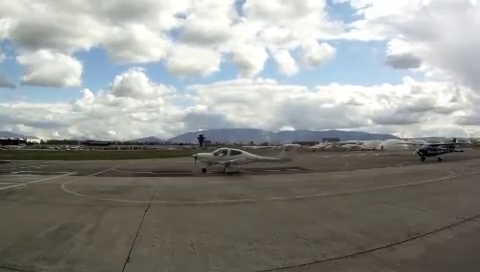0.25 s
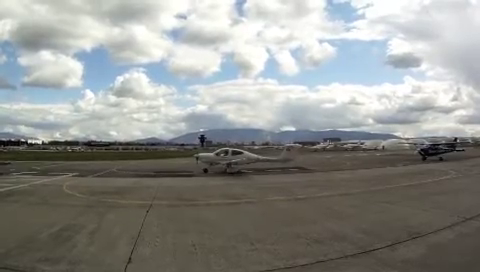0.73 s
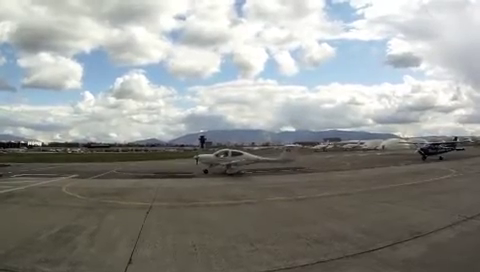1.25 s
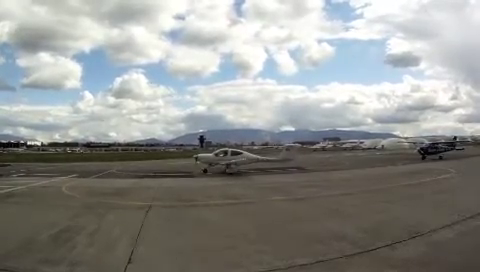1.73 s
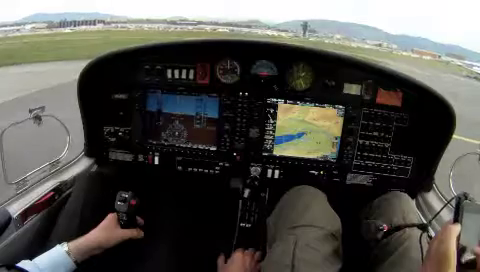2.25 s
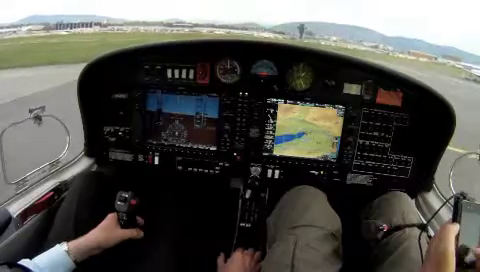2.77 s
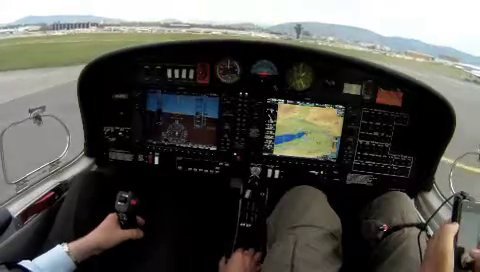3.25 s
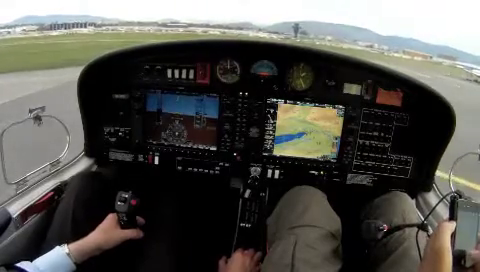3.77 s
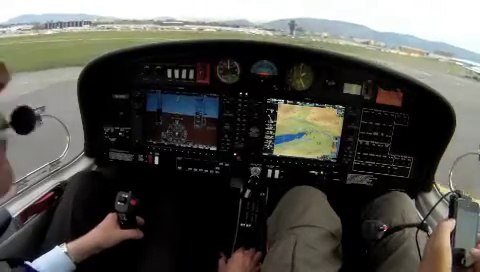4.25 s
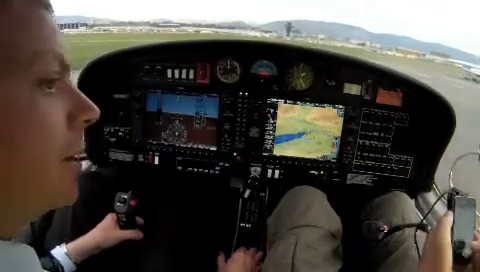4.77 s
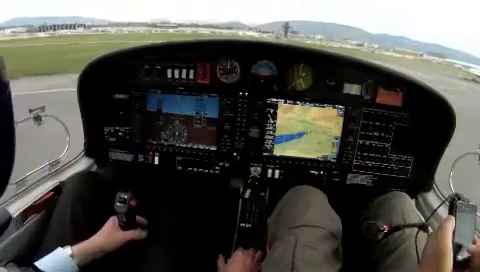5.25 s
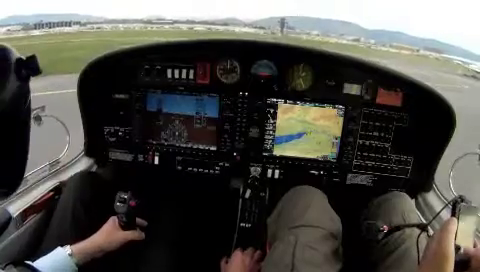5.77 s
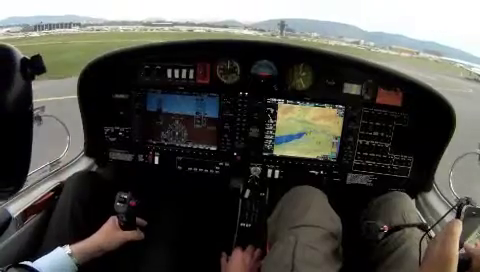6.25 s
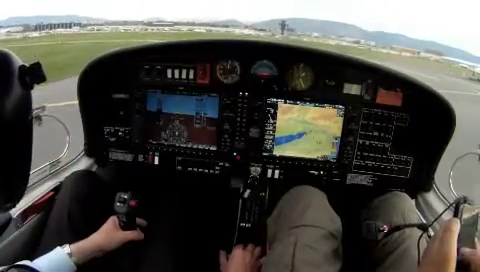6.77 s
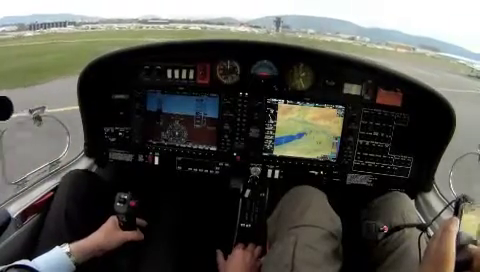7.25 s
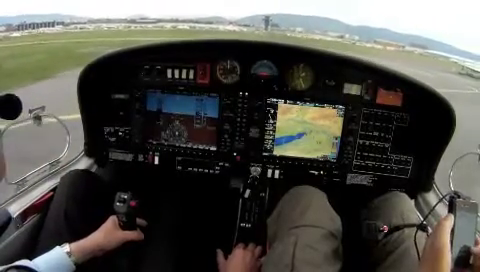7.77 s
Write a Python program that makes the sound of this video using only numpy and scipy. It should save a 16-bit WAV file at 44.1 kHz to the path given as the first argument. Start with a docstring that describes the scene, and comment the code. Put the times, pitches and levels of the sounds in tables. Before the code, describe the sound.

On an open apron a small propeller plane idles, its blades thudding, slapping and hissing in a rapid flutter over low exhaust puffs. At about two seconds it cuts abruptly to inside the cabin: a deep boom throbbing seven or eight times a second, with muffled engine clatter, faint gear whine and a few ticks. After six seconds the throttle opens slightly, pitch rises and a loose fitting rattles.

```python
"""An airport apron, then a cabin: a light aircraft with a geared four-cylinder piston engine idles.
Outside, three blades thud, slap and hiss over the exhaust puffs, each blade a pulse and a noise burst.
Inside, firing and blade tones beat into a throbbing boom; repeating noise bursts clatter, mesh tones whine.
The throttle opens a little and a loose fitting rattles. Coarse sampling adds a thin mirrored fizz."""
import sys
import numpy as np
from scipy.fft import rfft, irfft, next_fast_len
from scipy.io import wavfile
from scipy.ndimage import map_coordinates

SR = 44100
rng = np.random.default_rng(int(sys.argv[2]) if len(sys.argv) > 2 else 0)


def master(y):
    """Save y as 16-bit WAV."""
    cut = np.clip(np.atleast_2d(y).T, -1, 1)
    pcm = np.round(cut * 32767)  # scale
    wavfile.write(sys.argv[1], SR, pcm.astype(np.int16))


N = 353665
T = np.arange(N) / SR
GEAR_RATIO, BLADES = 1.69, 3  # crank turns per propeller turn
MESH_TEETH = 29
INSIDE_S, IDLE_HZ = 2.04, 31.68  # cabin takes over; crank idle speed there


# propeller hunting outside: (time [s], blade passing rate [Hz])
BLADE_RATE = [(0.0, 45.3), (0.23, 44.8), (0.532, 45.3), (1.464, 44.7), (1.864, 45.0), (1.97, 44.7)]
# throttle opening in two pushes: (time [s], crank speed above idle [Hz])
SPEED_UP = [(6.15, 0), (6.4, .93), (6.65, 1.37), (7, 2.66), (7.2, 3.04), (7.5, 3.3), (8, 3.4)]


def crank_speed():
    """Crank turns per second: slow idle outside; in the cabin a faster idle, then more throttle."""
    blade_rate_hz, = curves(BLADE_RATE)
    above_idle_hz, = curves(SPEED_UP)
    outside_hz = blade_rate_hz * GEAR_RATIO / BLADES
    cabin_hz = IDLE_HZ + above_idle_hz + 0.0201 * wobble(3)
    return np.where(T < INSIDE_S, outside_hz, cabin_hz)


def throttled(speed, idle, fast):
    """Passes from the idle to the fast value as crank speed rises 1.4 to 2.4 Hz above idle."""
    return idle + (fast - idle) * np.clip((speed - IDLE_HZ - 1.4) / 1.0, 0, 1)


# exhaust tones: (order [multiple of crank speed], level [dB])
EXHAUST = [(1, -46.5), (2, -30), (2.5, -59), (3, -43.5), (3.5, -63.5), (4, -30.5), (5, -50.5), (6, -29),
           (7, -38), (8, -33.5), (12, -47.5), (16, -51)]


def exhaust(crank):
    """Firing overtones cross zero together, a push then a sharp suck; other orders join with random phases, so
    the puffs stay even."""
    puffs = crank + 1 / 4
    total = 0
    for order, db in EXHAUST:
        phase = rng.random() if order % 2 else 1 / 4
        total = total + amp(db) * tone(order * puffs + phase, waver=0.019)
    return total


# thud level: (time [s], level before trim [dB])
THUD_LEVEL = [(0, -29), (.2, -26), (.8, -32.5), (1.35, -32), (1.9, -28)]
# thud spectrum: (frequency [Hz], relative level [dB])
THUD = [(45, -3), (90, -5), (135, -3.5), (180, 0), (225, 1.5), (270, -2.5), (315, -1.5), (360, -2),
        (405, -7), (450, -11.5), (520, -28)]


def blade_thud(blade):
    """Low pressure pulse from each passing blade."""
    level_db, = curves(THUD_LEVEL)
    pulses = slaps(blade, THUD, smear_rad=2.44, jitter_s=0.0001, scatter_db=-0.5, count=12)
    return amp(level_db - 0.8) * pulses


# blade wash: (time [s], swish level before trim [dB], hiss level before trim [dB])
WASH_LEVEL = [(0.0, -28.5, -33.5), (0.232, -29, -34), (0.554, -28, -32.5), (0.688, -28, -33),
              (1.18, -28, -31.5), (1.316, -30.5, -34.5), (1.9, -30, -33.5)]
# slap spectrum: (frequency [Hz], relative level [dB])
SLAP = [(400, -33), (450, -2.5), (495, -3), (540, 2.5), (585, 5), (680, 3), (720, -12.5), (770, -1.5),
        (855, 2), (920, -8), (1080, -11), (1220, -2), (1400, -20)]


def blade_slap(blade):
    """Sharper pulse per blade, growing faster than the swish when blades bite into rough air."""
    swish_db, _ = curves(WASH_LEVEL)
    pulses = slaps(blade - .1, SLAP, smear_rad=0.88, jitter_s=.00009, scatter_db=1.3, count=32)
    return amp(2.8 * (swish_db + 28) - 30.0) * pulses


# swish and hiss spectra: (frequency [Hz], relative level [dB])
SWISH = [(150, -39), (260, -2), (450, -5), (620, -3.5), (850, -4.5), (1000, -3.5), (1220, -3), (1500, -8),
         (2200, -30)]
HISS = [(820, -33.5), (1400, -6.5), (1680, 1), (1960, -4.5), (2280, -0.5), (2620, -7.5), (2890, -6),
        (3440, -8.5), (3770, -12.5), (4760, -11), (5600, -17), (7280, -44.5), (12300, -120)]


def blade_wash(blade):
    """Noise burst of swish and hiss from each passing blade; part of the hiss repeats per blade."""
    swish_db, hiss_db = curves(WASH_LEVEL)
    passing = bursts(blade, decay=0.62, floor=.78, scatter_db=3)
    swish = amp(swish_db - 2.0) * coloured(passing * rng.standard_normal(N), SWISH)
    hiss_noise = (passing + 1.0) * churn(blade, repeat=0.19, size=980)
    return swish + amp(hiss_db - 0.05) * coloured(hiss_noise, HISS)


# snaps in the wash: (time [s], relative peak [dB])
SNAPS = [(0.6895, -13), (1.1119, -9), (1.1564, -15), (1.408, -17.5)]
# snap spectrum: (frequency [Hz], relative level [dB])
SNAP = [(600, -1), (1500, 3.5), (3200, -0.5), (5500, -6.5)]


def wash_snaps():
    """Sharp noisy snaps in the blade wash."""
    return amp(-12.0) * taps(SNAPS, SNAP, rise_s=0.0029, t60_s=0.014)


# low wash spectrum: (frequency [Hz], relative level [dB])
LOW_WASH = [(10, -26.5), (22, -4), (45, 7), (90, -3), (150, 3.5), (230, 0), (400, -11.5), (600, -33)]


def low_wash():
    """Steady low-frequency noise of the wash."""
    return amp(-30.5) * coloured(rng.standard_normal(N), LOW_WASH)


def outside(crank, blade):
    """Exhaust and propeller summed as heard on the apron."""
    propeller = blade_thud(blade) + blade_slap(blade) + blade_wash(blade)
    return exhaust(crank) + propeller + wash_snaps() + low_wash()


# cabin resonance under the firing tone: (frequency [Hz], level before trim [dB])
FIRING_PATH = [(63.4, -21.5), (65, -15.5), (68, -13.4), (70, -13)]


def cabin_firing(speed, crank):
    """Two firings a turn; more throttle lifts the tone into a cabin resonance."""
    firing_db = along(FIRING_PATH, 2 * speed) - 1.05
    return amp(firing_db) * tone(2 * crank, waver=throttled(speed, idle=0.088, fast=.03))


# blade tones in the cabin: (multiple of blade rate, idle level [dB], fast level [dB])
BLADE_TONES = [(1, -31, -34.5), (2, -42, -50)]


def cabin_chop(speed, blade):
    """The lowest lies 7 to 8 Hz below the firing tone and beats with it; the second is its octave."""
    return sum(amp(throttled(speed, idle, fast)) * tone(k * blade, waver=0.041)
               for k, idle, fast in BLADE_TONES)


# other engine tones: (order [multiple of crank speed], idle level [dB], fast level [dB])
DRONE = [(.5, -48.5, -55.5), (2.493, -37, -40.5), (2.987, -35, -46.5), (3.55, -40.5, -54), (3.91, -42, -56),
         (5.987, -48.5, -51.5), (7.95, -55, -57), (10.01, -55, -60.5), (12.04, -57, -68),
         (18.09, -54.5, -49.5), (20, -50.5, -60), (21.3, -54.5, -79), (21.9, -62.5, -63),
         (24.03, -57, -51.5), (25.96, -49.5, -65), (29.48, -57.5, -74.5), (30.65, -62, -74.5),
         (41.8, -64.5, -75.5), (49.9, -67.5, -66), (109, -74, -105)]


def cabin_drone(speed, crank):
    """Low orders keep step with firing; higher ones arrive by many airframe paths, phases random."""
    total = 0
    for order, idle, fast in DRONE:
        phase = (order > 4) * rng.random()
        total = total + amp(throttled(speed, idle, fast)) * tone(order * crank + phase, waver=0.21)
    return total


# boom surges and sags: (time [s], level change [dB])
SURGES = [(3.9, 4), (4.55, -8.5), (5.6, 6.5), (5.87, -7)]
# boom spectrum: (frequency [Hz], relative level [dB])
BOOM = [(10, -27), (20, -22), (35, -22.5), (50, -9), (70, -2), (110, 1.5), (125, -16), (145, -15.5),
        (200, -38.5)]


def cabin_rumble(speed):
    """Low noise that wavers, surges and sags."""
    surge_s, waver_db = 0.11, 2
    surge_db = sum(db * np.exp(-((T - s) / surge_s) ** 2) for s, db in SURGES)
    boom_db = throttled(speed, idle=-28.5, fast=-34) + surge_db + waver_db * wobble(3.886)
    return amp(boom_db + 1.4) * coloured(rng.standard_normal(N), BOOM)


# panel, knock and clatter spectra: (frequency [Hz], relative level [dB])
PANELS = [(120, -9.5), (150, 4.5), (195, -1), (225, -3), (260, 1.5), (290, -10.5), (400, -12.5), (480, -11),
          (600, -28)]
KNOCK = [(200, -28.5), (330, -8), (480, -10), (570, 2.5), (680, 2.5), (800, 1.5), (865, -4.5), (960, 0.5),
         (1040, -16), (1400, -41.5)]
CLATTER = [(620, -39), (1050, -12.5), (1290, -6.5), (1410, -14.5), (1550, -5), (1690, -8.5), (1840, -5),
           (1900, -4), (2000, -11), (2570, -18), (2840, -17), (3090, -19.5), (3580, -27), (3780, -30.5),
           (5600, -38), (7280, -73), (12300, -120)]


def cabin_clatter(speed, crank):
    """Combustion knock and valve clatter through the firewall, partly repeating every two turns."""
    # knock is stronger in a narrow speed range
    shudder_hz, shudder_width_hz, shudder_db = 33.1, 0.47, 4
    shudder = np.exp(-((speed - shudder_hz) / shudder_width_hz) ** 2)
    knock_db = throttled(speed, idle=-40.5, fast=-42.5) + shudder_db * shudder
    clatter_db = throttled(speed, idle=-47.5, fast=-50)
    cycle = crank / 2
    firings = bursts(2 * crank, decay=0.52, floor=0.9, scatter_db=2.0)
    # one cylinder knocks harder
    uneven = bursts(crank, decay=0.6, floor=0.6, scatter_db=1.0)
    uneven = uneven * bursts(cycle - .62, decay=0.3, floor=1.9, scatter_db=3.0)
    panels = amp(-44) * coloured(churn(cycle, repeat=0.23, size=2784), PANELS)
    knock_noise = firings * uneven * churn(cycle, repeat=0.44, size=2784)
    clatter_noise = (firings + 0.42) * churn(cycle, repeat=0.33, size=2784)
    knock = amp(knock_db - 3.0) * coloured(knock_noise, KNOCK)
    return panels + knock + amp(clatter_db - 1) * coloured(clatter_noise, CLATTER)


# cabin resonances under two mesh overtones: (frequency [Hz], level [dB])
LOW_WHINE_PATH = [(1840, -53.5), (1950, -56.5), (1975, -79.5)]
HIGH_WHINE_PATH = [(2755, -67), (2820, -61), (2880, -64), (2925, -57), (2950, -63), (2995, -67),
                   (3045, -71)]


def gears(speed, crank):
    """Tooth-mesh overtones swell and fade through cabin resonances; the lower is roughened every turn."""
    low_db = along(LOW_WHINE_PATH, 2 * MESH_TEETH * speed)
    high_db = along(HIGH_WHINE_PATH, 3 * MESH_TEETH * speed)
    roughness = bursts(crank, decay=0.25, floor=2.6, scatter_db=-3.3)
    low = amp(low_db) * unit(tone(2 * MESH_TEETH * crank, waver=0.2) * roughness)
    return low + amp(high_db) * tone(3 * MESH_TEETH * crank, waver=0.25)


# fitting ticks: (time [s], relative peak [dB])
TICKS = [(2.5336, -39), (3.166, -39.5), (4.3006, -38.5), (6.4668, -45.5), (6.602, -45), (6.6645, -35.5),
         (6.739, -46), (6.784, -38), (6.963, -44.5), (7.086, -48.5), (7.1723, -44), (7.5184, -42.5),
         (7.6452, -46), (7.8884, -48)]
# tick spectrum: (frequency [Hz], relative level [dB])
FITTING = [(1200, -30.5), (2300, 2.5), (3000, 11), (3600, -1.5), (4500, -8), (5600, -12)]


def fitting(speed, crank):
    """Loose fitting ticks, and crackles finely with the firing as the engine speeds up."""
    shake = np.clip((speed - 32) / 1.2, 0, 1)
    contacts = bursts(2 * crank, decay=0.24, floor=.15, scatter_db=3.2) * rng.standard_normal(N)
    crackle = coloured(contacts, [(1800, -17), (3000, 3), (5600, -4)])
    ticks = taps(TICKS, FITTING, rise_s=0.03, t60_s=0.05)
    return amp(-70.0) * shake * crackle + amp(-9.5) * ticks


def cabin(speed, crank, blade):
    """Boom, clatter, gear whine and fitting summed as heard inside."""
    boom = cabin_firing(speed, crank) + cabin_drone(speed, crank) + cabin_chop(speed, blade)
    boom = boom + cabin_rumble(speed)
    return boom + cabin_clatter(speed, crank) + gears(speed, crank) + fitting(speed, crank)


def tone(turns, waver):
    """Cosine locked to a shaft, rms 1 before it wavers in strength and phase."""
    angle = 2 * np.pi * turns
    in_phase = np.cos(angle) * (1 + waver * wobble(9))
    quadrature = waver * wobble(9) * np.sin(angle)
    return np.sqrt(2) * (in_phase + quadrature)


def slaps(turns, spectrum, smear_rad, jitter_s, scatter_db, count):
    """One pulse a turn, overtones scattered by the ground; time and size vary a little."""
    uneven = turns + jitter_s * wobble(39.46) * np.gradient(turns) * SR
    k = np.arange(1, count + 1)[:, None]
    phase = smear_rad * rng.standard_normal(k.shape)
    shape = np.cos(2 * np.pi * k * np.arange(1024) / 1024 + phase).sum(0)
    train = map_coordinates(shape, [uneven % 1 * len(shape)], mode="grid-wrap")
    return coloured(train * amp(scatter_db * wobble(39.68)), spectrum)


def bursts(turns, decay, floor, scatter_db):
    """Envelope jumping once a turn to a random height; decay is a share of the turn."""
    heights = amp(scatter_db * rng.standard_normal(1024))
    return floor + heights[np.floor(turns).astype(int)] * np.exp(-(turns % 1) / decay)


def churn(turns, repeat, size):
    """White excitation: the repeat share of its power recurs every turn, the rest is new."""
    pattern = unit(irfft(np.exp(2j * np.pi * rng.random(size // 2 + 1))))
    again = map_coordinates(pattern, [turns % 1 * size], mode="grid-wrap")
    share = np.clip(repeat, 0, 1)
    return np.sqrt(share) * again + np.sqrt(1 - share) * rng.standard_normal(N)


def taps(rows, spectrum, rise_s, t60_s):
    """Short noisy contacts, each rising and dying 60 dB in the given times."""
    envelope = sum(amp(db - 60 * np.abs(T - s) / np.where(T < s, rise_s, t60_s)) for s, db in rows)
    return envelope * coloured(rng.standard_normal(N), spectrum)


def coloured(x, spectrum):
    """x shaped by (frequency [Hz], level [dB]) points, falling away beyond them, rms 1."""
    f, db = np.transpose(spectrum)

    def response(hz):
        skirt = np.minimum(1, f[-1] / (hz + 1)) ** 4 * np.minimum(1, hz / f[0]) ** 2
        return amp(np.interp(np.log(hz + 1), np.log(f), db)) * skirt

    return unit(filtered(x, response))


def filtered(x, response):
    """x times a response of frequency [Hz]."""
    size = next_fast_len(N + SR // 2)
    return irfft(rfft(x, size) * response(np.fft.rfftfreq(size, 1 / SR)), size)[:N]


def wobble(rate_hz):
    """Smooth random curve with rate_hz knots a second."""
    return map_coordinates(rng.standard_normal(int(N * rate_hz / SR) + 4), [T * rate_hz])


def along(points, hz):
    """Level [dB] that (frequency [Hz], level [dB]) points give a moving tone."""
    return np.interp(hz, *np.transpose(points))


def curves(rows):
    """One value per sample for each column after the time."""
    s, *cols = np.transpose(rows)
    return [np.interp(T, s, c) for c in cols]


def amp(db):
    """Decibels to gain."""
    return 10 ** (np.asarray(db) / 20)


def unit(x):
    """x at rms 1."""
    return x / np.sqrt(np.mean(x ** 2) + 1e-20)


def scene():
    """Outside sound fades quickly; the cabin takes over."""
    aligned_s = 4.496  # crest of the throb: a blade passes just as a cylinder fires
    speed = crank_speed()
    turns = np.cumsum(speed) / SR
    crank = turns - turns[round(aligned_s * SR)]
    blade = crank * BLADES / GEAR_RATIO
    leaving = np.clip((INSIDE_S - T) / 0.094, 0, 1)
    entering = np.clip((T - INSIDE_S + 0.0014) / 0.071, 0, 1)
    return (leaving * outside(crank, blade) + entering * cabin(speed, crank, blade))[None]


def record(dry):
    """Holding samples at a low rate mirrors the sound about that rate as a thin fizz."""
    hold_hz, band_hz, top_hz = 12000, 5600, 15350
    ending = np.clip((T[-1] - T) / .006, 0, 1)
    sound = filtered(dry[0] * ending, lambda hz: 1 / np.sqrt(1 + (hz / band_hz) ** 40))
    # image gain = source frequency / image frequency: differentiate, shift, integrate
    slope = filtered(sound, lambda hz: 1j * hz)
    mirrored = slope * 2 * np.cos(2 * np.pi * hold_hz * T)
    fizz = filtered(mirrored, lambda hz: (hz > hold_hz / 2) / (1j * (hz + 1)))
    return filtered(sound + fizz, lambda hz: hz < top_hz)[None]


dry = scene()
out = record(dry)
master(out)
```